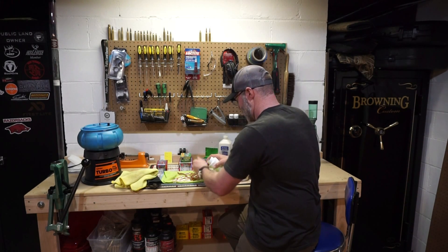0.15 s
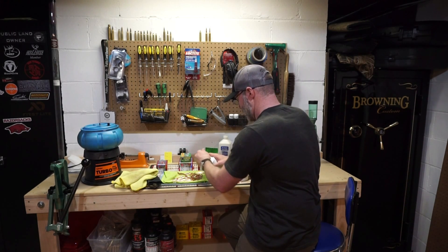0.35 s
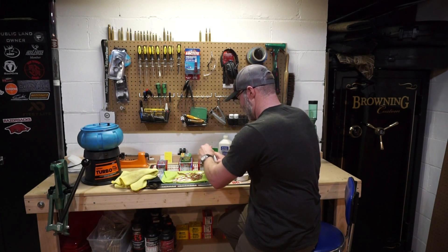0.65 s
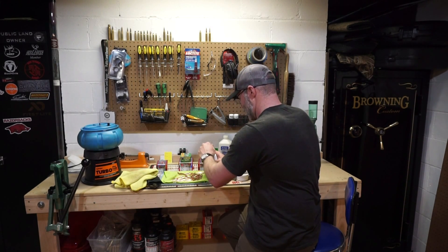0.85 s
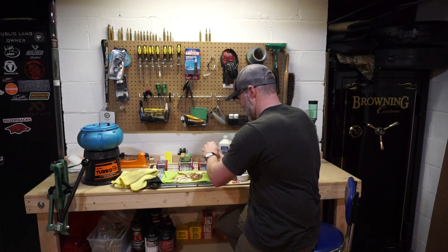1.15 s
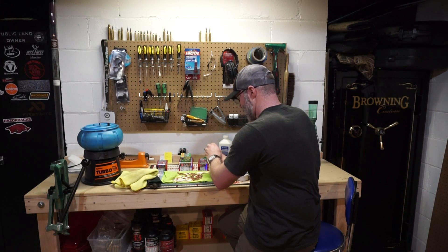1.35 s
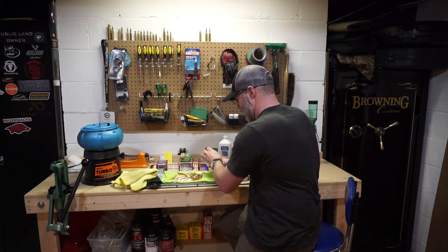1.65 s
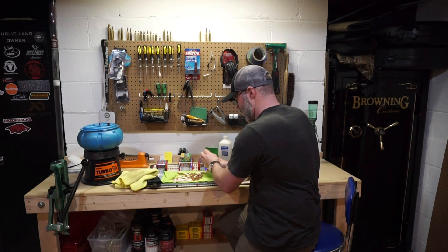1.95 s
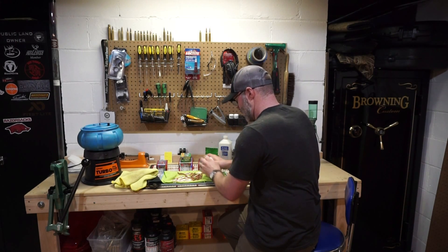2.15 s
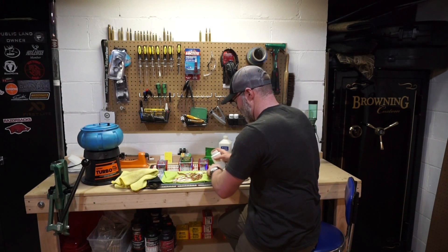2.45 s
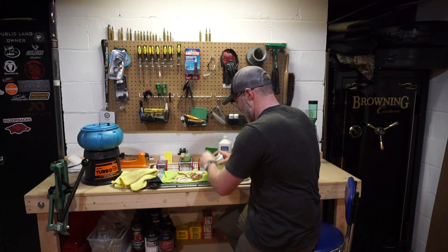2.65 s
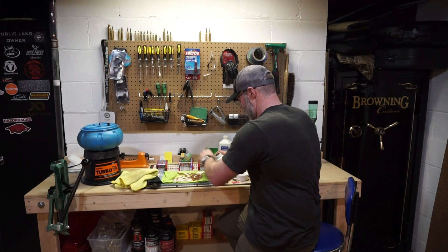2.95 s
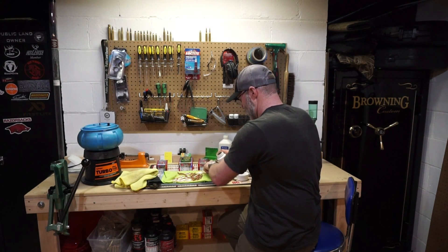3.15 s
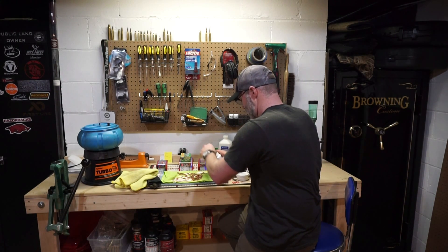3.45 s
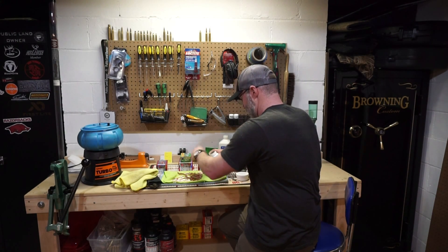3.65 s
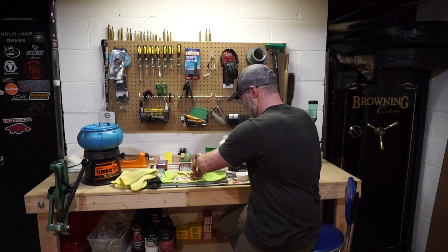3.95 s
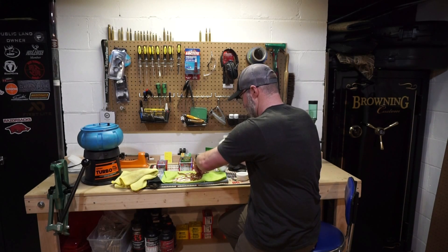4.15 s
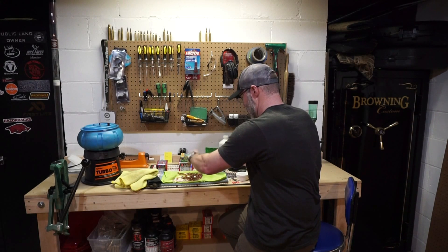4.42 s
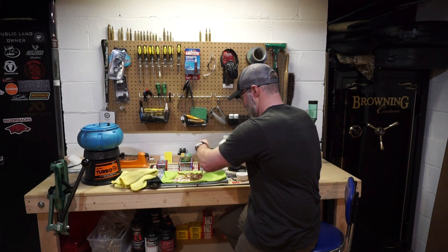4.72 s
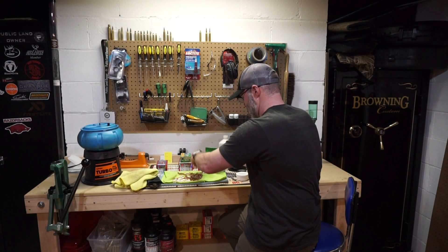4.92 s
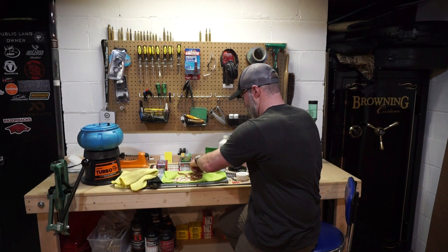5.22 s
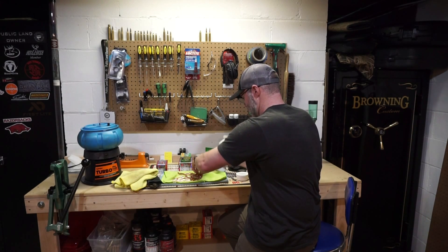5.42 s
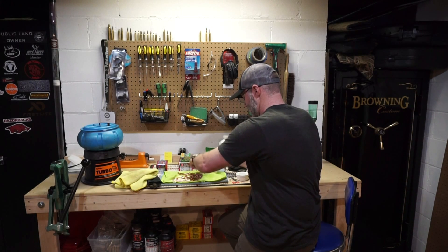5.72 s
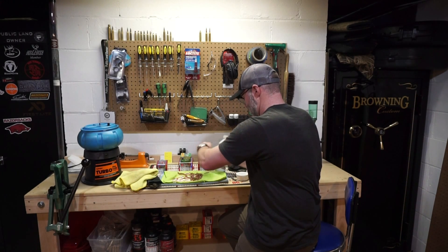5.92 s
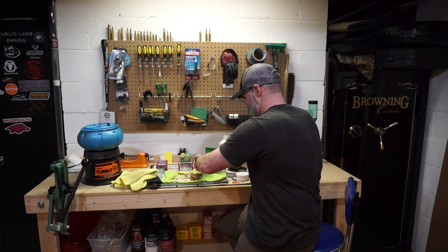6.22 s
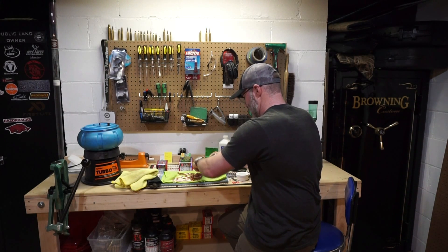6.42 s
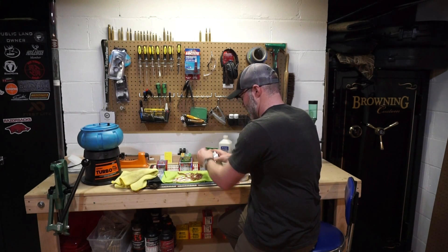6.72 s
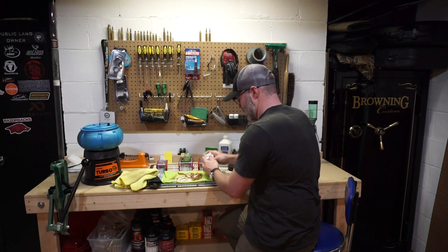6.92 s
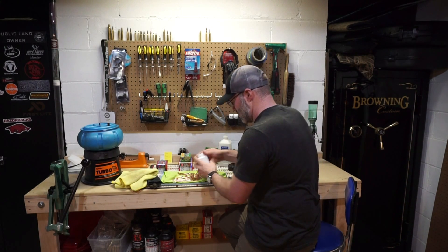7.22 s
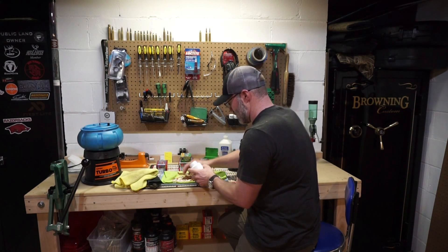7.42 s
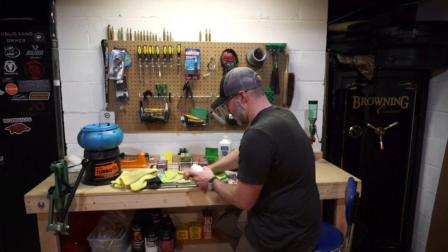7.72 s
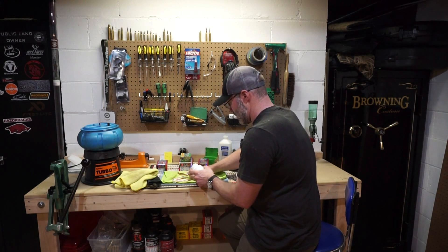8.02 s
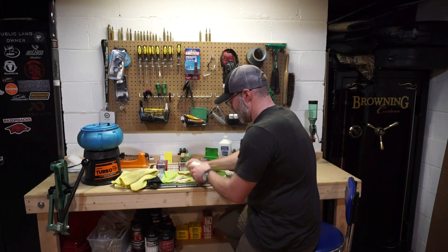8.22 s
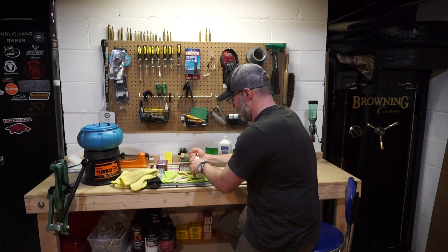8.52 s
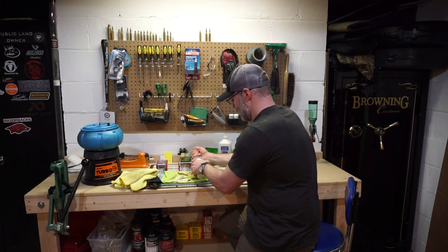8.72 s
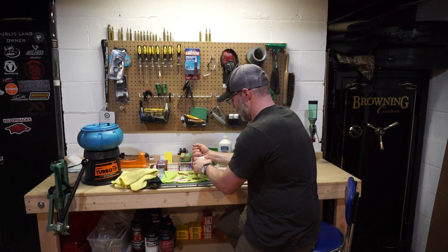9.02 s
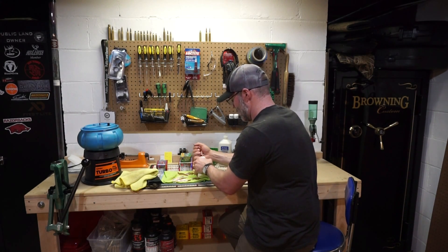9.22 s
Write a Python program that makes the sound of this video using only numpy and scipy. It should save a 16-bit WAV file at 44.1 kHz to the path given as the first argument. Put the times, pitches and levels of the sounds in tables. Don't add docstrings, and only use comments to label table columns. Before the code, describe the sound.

Fingers pick at small hollow brass shells with very high, thin clinks, then drop them by the handful into a plastic tub on a wooden bench. The tub answers with dry, hollow knocks and short rattles, some with a soft bench thump. Bursts alternate with sparse ticking and quieter gaps. Close stereo microphone, tub slightly left, short hard-walled room tail, faint ventilation and motor hum.

```python
import sys
import numpy as np
from scipy import signal
from scipy.fft import rfft, irfft
from scipy.io import wavfile
from scipy.ndimage import uniform_filter1d

SR = 44100
rng = np.random.default_rng(int(sys.argv[2]) if len(sys.argv) > 2 else 0)


def ratio(d):
    e = np.asarray(d, float) / 20
    return 10 ** e


def output_pcm(signal):
    pcm = np.clip(np.atleast_2d(signal).T, -1, 1) * 32767
    wavfile.write(sys.argv[1], SR, np.round(pcm).astype(np.int16))


N = 413216

# (time [s], peak [dB], click against ring [dB], left-right difference [dB])
PICKS = [(0.0074, -9, -33.5, 8), (0.0201, -7, -38, 4.0), (0.538, -22, -22, 1), (0.5473, -9.5, -31.5, 4),
         (0.621, -24.5, -21, -8), (0.699, -20, -23.5, -1.5), (0.7235, -15, -34, -10),
         (1.1932, -13, -22, -1.5), (1.772, -9, -20, 1.5), (1.859, -20, -26, 1.5), (2.1082, -17.5, -27, 12),
         (3.1944, -19, -27, 2), (3.91, -12.5, -26, 4), (3.9564, -25, -23.5, -20), (4.014, -24, -24, -9),
         (4.0338, -4.5, -36.5, 2), (4.0667, -1.5, -36.5, 2), (4.1085, -15, -32, 7), (4.1465, -11.5, -36, 5),
         (4.2916, -22, -32, 1.5), (4.351, -21.5, -33, 7), (4.3844, -23, -33, -1.5),
         (4.4308, -23.5, -34, 0.0), (4.5133, -19.5, -29.5, 6), (4.563, -13, -37, 6),
         (4.6389, -18, -42, 3.0), (4.7122, -11, -44, 1.5), (5.2744, -37, -27.5, 16)]
# (time [s], peak [dB], click against ring [dB], left-
# right difference [dB])
LATER_PICKS = [(5.4909, -17, -29, 6), (5.504, -7.5, -43, 2), (5.569, -14, -42, 2.5), (5.598, -24, -29, 2.5),
               (5.6532, -17, -30, 1.5), (5.658, -5.5, -36, -1.5), (5.683, -15, -29, 1.5), (5.798, -20, -33, 5),
               (6.161, -11, -11, -1), (6.188, -3.5, -18, -1), (7.6045, -9, -28, 15.5), (7.6825, -8, -22.5, 5),
               (7.7324, -6, -37, 19), (7.773, -10.5, -26, 16), (7.849, -7, -30, 3), (7.8907, -11, -30, 1.0),
               (7.9223, -1, -29.5, 2), (7.938, -6, -27, 2.5), (8.0331, -9.5, -27, 3), (8.0729, -6.5, -17.5, 4),
               (8.2312, -20, -23, 14), (8.2786, -28, -23, 0.0), (8.382, -20, -29, 3.5), (8.4029, -1.5, -24.5, 3),
               (8.47, -14, -23, -2), (9.0828, -17.5, -6.5, 0), (9.152, -7.5, -27, 6), (9.208, 1.5, -34, 0.0),
               (9.3294, -3.5, -26, -2), (9.3545, -1, -21, -0.5)]
# (time [s], tub peak [dB], shell ring [dB], hollow against peak [dB])
DROPS = [(0.417, -38, -41, -4), (0.433, -27, -42, -1.5), (0.713, -21.5, -38, -26), (0.747, -14, -21.5, -15),
         (0.828, -6, -9, -14), (0.851, -0.5, -10, -11.5), (0.883, -5, -27, -19), (0.931, -26, -25, -23),
         (0.987, 0.5, -15, -14.5), (1.104, -2, -7, -15.5), (1.229, -11.5, -15.5, -14),
         (1.346, -15.5, -28, -22.5), (1.614, -11, -60, -28), (1.713, -7, -24, -24), (1.733, -7, -11.5, -30),
         (1.801, -14, -18, -8.5), (1.823, -10, -27, -17.5), (2.454, -34.5, -46, -22),
         (2.495, -32, -45, -19), (2.711, -60, -36, -32), (2.877, -32, -49, -10), (2.892, -25.5, -44, -16),
         (2.994, -8.5, -17, -31), (3.021, -1, -7, -24), (3.511, -44, -41, -26), (3.644, -12.5, -32, -55),
         (3.675, -7, -1.5, -51), (3.704, -3.5, -2, -45), (3.767, -9.5, -5, -25)] + [(4.751, -9, -26, -11), (4.874, -6.5, -9.5, -31), (4.907, -2, -10, -29),
                           (4.939, -5, -3.5, -36), (4.972, -2, -16, -31), (5.01, -6.5, -11, -13.5),
                           (5.085, -11.5, -19, -11.5), (5.111, -15, -17.5, -17), (5.178, -22.5, -38, -17),
                           (6.014, -28, -51, -17), (6.093, -13.5, -43, -49), (6.127, 0.5, -11, -18.5),
                           (6.292, -16.5, -22.5, -18), (6.415, -29.5, -43, -21), (6.452, -25, -33, -29),
                           (6.577, -31, -37, -28), (6.669, -32.5, -38, -30), (6.712, -13.5, -27, -13.5),
                           (6.799, -18, -37, -25), (6.842, -17.5, -43, -34), (6.878, -28, -32, -23),
                           (6.904, -9.5, -8.5, -26), (6.963, -14, -18, -18), (7.182, -27.5, -35, -39),
                           (7.212, -22.5, -24, -38), (7.239, -10, -23, -25), (7.284, -22, -18, -30),
                           (7.34, -14.5, -30, -30), (7.37, -11, -17, -26), (7.519, -20, -34, -18)] + [(7.617, -25, -25, -36), (7.638, -19, -21, -42),
                                             (7.763, -20.5, -34, -32), (8.486, -11, -19, -15),
                                             (8.535, -37, -32, -13), (8.558, 2, -19, -15.5),
                                             (8.612, -2.5, -11, -16), (8.685, -7, -33, -3.5),
                                             (8.727, -13, -19, -35), (8.836, -31, -38, -51),
                                             (8.913, -12, -16, -20), (8.939, -8.5, -7, -22),
                                             (9.068, -9.5, -29, -25), (9.168, -13, -24, -38),
                                             (9.214, -1.5, -15, -5.5), (9.265, -12.5, -4.5, -8),
                                             (9.289, -13, -24, -36), (9.315, -9.5, -7.5, -44)]
SHELL_HZ, SHELL_SCATTER_HZ, SHELL_BAND_HZ = 14220, 227, 380
LOOSE_FROM_S, LOOSE_SHARP_HZ = 3.5, 232
SHELL_RISE_S, CHATTER_DB, CHATTER_T60_S = 0.00035, -8, 0.04
LANDING_LAG_S, LANDING_RING_DB, LANDING_CLICK_DB = 0.0034, 5.5, -21

# (frequency [Hz], level [dB], t60 [s])
TUB_MODES = [(737, -9, 0.062), (1030, -28, 0.066), (1310, -2, 0.073), (1410, -71, 0.029), (1750, -33, 0.24),
             (1870, -1, 0.1), (2100, 3, 0.066), (2378, 3.5, 0.064), (3370, -4.5, 0.1), (4620, 10, 0.012),
             (6640, -4, 0.1)]
# (frequency [Hz], level per Hz [dB])
CRACK_SPECTRUM = [(150, -35.5), (250, -31), (544, 1), (856, 1), (1060, -4.5), (3230, 3), (8540, -11),
                  (12000, -6.5), (15600, -33), (22000, -120)]
# (time [s], hollow [Hz], lower wall mode [dB], upper wall mode [dB], hollow in the rattle [dB])
GRIP = [(.4, 491, 8, -24, -6), (.8, 453, 0, -25, -11), (1.2, 453, 2, 4, -6), (1.7, 439.6, 2, 1, -15),
        (2.5, 517, -20, -24, -7), (3.9, 511, -20, -30, -27), (4.75, 459, -18, -6, -8),
        (5.0, 518.3, -11, -6, -10), (6.9, 506, -11, -9, -10), (7.3, 497, -16, -8, -7),
        (7.5, 493, -24, -21, -10), (8.5, 499, -2, -31, -8), (8.57, 455, 2, -31, -10),
        (8.66, 480, 2, -31, -19), (9.37, 455.6, -11, -15, -12)]
# (time [s], peak [dB])
TOUCHES = [(.529, -34), (.633, -45), (1.03, -4), (1.06, -16), (2.107, -28.5), (2.133, -33), (4.927, -10),
           (6.516, -27.5), (7.395, -9.5), (7.415, -21), (7.55, -17), (7.675, -20), (7.71, -21), (7.79, -25),
           (7.841, -22.5), (1.607, -20), (8.314, -42), (8.35, -28), (8.44, -25), (2.711, -28),
           (8.075, -26.5), (8.14, -32)]
MODE_SPREAD_DB, WALL_SCATTER, CRACK_RISE_S = 3.5, 0.024, 0.001
HOLLOW_SPLIT_HZ, HOLLOW_T60_S = 28, 0.13
TUB_LOW_HZ = 363

# (time [s], peak [dB], frequency [Hz])
LOW_PINGS = [(0.5287, -38.5, 2270), (0.633, -44, 2180), (0.7128, -19.5, 2130), (0.7462, -20, 2190),
             (0.828, -5.5, 1830), (0.854, 1.5, 1860), (0.8809, -22, 1900), (0.9298, -20, 1870),
             (0.9862, -9, 2220), (1.0266, -3.5, 1820), (1.0482, -4, 1830), (1.1036, -6.5, 1960),
             (1.2273, -21, 1900), (1.3474, -18, 2065), (1.6142, -11, 2040), (1.7123, -25, 1710),
             (1.799, -23, 1790), (2.1046, -40, 1980), (2.4982, -42, 1970), (2.8906, -44, 1870),
             (2.9936, -35, 2150), (3.021, -34, 2070), (3.5189, -39.5, 2140), (3.6441, -20, 2200),
             (3.703, -28, 2150), (4.751, -21, 1920), (4.8736, -15, 1930), (4.9395, -15, 1760),
             (4.9731, -23, 2140), (5.0094, -15, 1890), (5.0858, -23, 1840), (5.1774, -32, 2100),
             (6.094, -17, 2280), (6.128, -16, 1910), (6.2923, -25, 1910), (6.4512, -32, 1890),
             (6.5154, -41, 1890), (6.7118, -30, 1820), (6.7984, -25, 1940), (6.9027, -28, 1960),
             (6.9618, -19, 1940)] + [(7.2125, -31, 1930), (7.2384, -36, 1910), (7.2858, -13, 1910),
                                 (7.3412, -17, 2010), (7.3694, -20, 2070), (7.3951, -16, 1965),
                                 (7.4145, -29, 1930), (7.5193, -24, 1980), (7.5494, -27, 2330),
                                 (7.6176, -34, 1760), (7.674, -21.5, 1990), (7.7124, -25, 2000),
                                 (7.8416, -32, 1800), (8.4028, -34, 1970), (8.4402, -39, 1990),
                                 (8.4866, -23, 1940), (8.5579, -1, 2236), (8.6143, -5, 1770),
                                 (8.6294, -9, 1800), (8.6847, -20, 2020), (8.7271, -18, 2110),
                                 (8.8363, -28.5, 2090), (8.9391, -30, 1940), (9.0678, -30, 1980),
                                 (9.1674, -30, 2000), (9.2145, -28, 2130), (9.2658, -16, 2000),
                                 (9.2884, -14, 2230), (9.3144, -26, 1980), (9.3447, -14, 1780)]
# (time [s], peak [dB], frequency [Hz])
HIGH_PINGS = [(0.8524, -14, 3360), (0.9877, -18, 3630), (1.2296, -16.5, 3530), (1.7135, -24, 3650),
              (1.822, -20, 3430), (2.1066, -38, 3880), (2.9954, -22, 3060), (3.0217, -9, 3740),
              (4.7506, -25, 3580), (4.874, -23, 3180), (4.908, -13, 3220), (5.01, -7, 3320),
              (5.0858, -15.5, 3350), (5.1104, -19, 2500), (6.0144, -36, 3160), (6.128, -17, 2640),
              (6.161, -17, 3170), (6.1873, -10, 3200), (6.293, -16, 3230), (6.4522, -23.5, 3280),
              (6.714, -25, 2540), (6.8438, -24, 3800), (6.8805, -26, 3340), (6.903, -13, 3370),
              (6.9626, -11.5, 3260), (6.989, -14, 3260), (7.182, -22, 3260), (7.2387, -17, 3320),
              (7.3692, -13, 3420), (7.3944, -27, 3330), (7.547, -27, 2600), (7.6181, -25, 2550),
              (7.6417, -22, 2760), (7.675, -27, 2780), (7.7085, -24, 2730), (7.7633, -30, 2910),
              (7.7852, -24, 2860), (8.5574, -9, 2505), (9.066, -22, 3310), (9.215, -10, 3300)]
# (time [s], peak [dB], frequency [Hz])
ODD_PINGS = [(.747, -17, 700), (.535, -35, 660), (1.35, -18, 1820), (1.62, -16, 1900), (4.751, -13.5, 3400),
             (7.38, -18, 4830), (7.65, -23, 4200), (0.884, -6.5, 1270), (1.734, -12, 1550),
             (1.733, -27, 1310), (1.823, -18, 730), (3.675, -13.5, 1300), (3.021, -5, 4870),
             (4.874, -12.5, 764), (4.927, -5, 4350), (4.972, -15, 4380), (8.565, -8, 703),
             (8.563, -9.5, 1020), (8.939, -12, 4690), (9.265, -17, 5300), (9.289, -11, 4900)]
# (time [s], peak [dB], frequency [Hz], t60 [s])
RINGING = [
    (.434, -30.5, 1860, .16),
    (.434, -31, 1290, 0.099),
    (5.045, -27, 511, .15),
    (5.179, -26, 3260, 0.076),
]
PING_DB, PING_T60_S, PING_RISE_S = 1.5, 0.028, 0.001
TWIN_SHARP, TWIN_DB = 1.047, 0

# (start time [s], hold [s], shells [dB], tub [dB])
POURS = [(0.825, 0.3, -10, -10), (1.721, 0.11, -28, -23.5), (3.015, 0.011, -7, -3),
         (3.674, 0.039, -14, -7.5), (4.869, 0.077, -8.5, -9), (5.503, 0.074, -28, -70),
         (6.132, 0.049, -17, -12), (6.898, 0.037, -18, -15.5), (7.226, 0.2, -27.5, -24.5),
         (7.526, 0.28, -39, -33), (7.632, 0.35, -20.5, -39.5), (8.027, 0.5, -34.5, -50),
         (8.442, 0.084, -35, -28), (8.554, 0.13, -16.5, -18.5), (8.928, 0.0075, -34, -10.5),
         (9.057, 0.067, -31, -31.5), (9.207, .2, -24, -16)]
POUR_ATTACK_S, POUR_RELEASE_DB_PER_S, RESTING_DB = 0.0083, 278, -67
HEAP_PER_S, HEAP_T60_S = 900, 0.022
SLIDE_HOLLOW_HZ = (452, 480, 512)
UPPER_WALL_HZ, WALL_T60_S, SLIDE_WALL_DB = 3280, 0.04, -3

# (time [s], peak [dB])
THUDS = [
    (0.748, -20),
    (3.02, -21),
    (6.128, -20),
    (8.939, -23.5),
]
# (frequency [Hz], level [dB], t60 [s])
BENCH_MODES = [(86, -20, 0.26), (184, -11, 0.048), (274, -4, 0.063)]

# (frequency [Hz], t60 [s])
WALLS = [(300, 0.22), (1000, 0.27), (4000, 0.27), (9000, 0.21), (14500, 0.2)]
# (frequency [Hz], likeness [-1 to 1])
ECHO_LIKENESS = [(250, -0.063), (600, 0.69), (2000, 0.19), (5000, 0.06), (14000, -0.098)]
PINGS_WET_DB, SHELLS_WET_DB = -4, -3

# (frequency [Hz], level per Hz [dB])
AIR_SPECTRUM = [(15, -36), (25, -16.5), (117, -8.5), (153, -12.5), (285, -10), (405, -14), (503, -12.5),
                (734, -12.5), (840, -9), (1040, -17.5), (1330, -20), (2050, -24.5), (16000, -28)]
# (frequency [Hz], likeness [0 to 1])
AIR_LIKENESS = [(30, 0.9), (70, 1), (130, 0.81), (280, 0.43), (600, 0.28), (2000, 0.027), (8000, 0.033)]
# (centre [Hz], width [Hz], level [dB])
HUM = [(841, 4.6, -58), (903, 49, -61)]
# (time [s], level [dB])
WHINE = [(0, -50), (3.6, -52), (4.2, -61.5), (9.37, -60)]
# (time [s], level [dB])
RUMBLE = [(0, 0.5), (.82, 3.5), (.9, -10), (1.8, -1.5), (2.8, 3), (3.4, 7), (4.0, -0.5), (6.5, -1),
          (7.2, 1), (9.37, 2.5)]
AIR_DB, RUMBLE_HZ = -46.5, 266
WHINE_HZ, WHINE_CLIMB_HZ_PER_S = 281, 2.1
MAINS_HZ, MAINS_DB = 119, -59
BEATS_PER_S, BEAT_TOP_S = 1.05, 3.36
CUTOFF_HZ = 15660


def rms_one(x):
    return x / np.sqrt(np.mean(x ** 2) + 1e-20)


def in_time(rows):
    s, *columns = np.transpose(rows)
    return [np.interp(np.arange(N) / SR, s, c) for c in columns]


def at_hz(points, hz):
    table_hz, values = np.transpose(points)
    return np.interp(np.log(np.maximum(hz, 1)), np.log(table_hz), values)


def coloured(x, spectrum):
    cepstrum = irfft(np.log(ratio(at_hz(spectrum, np.fft.rfftfreq(1024, 1 / SR)))))
    cepstrum[1:512] *= 2
    cepstrum[513:] = 0
    return signal.fftconvolve(x, irfft(np.exp(rfft(cepstrum))))[:N]


def ring(clicks, hz, t60):
    r, w = ratio(-60 / (t60 * SR)), 2 * np.pi * hz / SR
    return signal.lfilter([0, np.sin(w)], [1, -2 * r * np.cos(w), r * r], clicks + 1e-18)


def decaying(hz, t60, size=4500):
    t = np.arange(size) / SR
    return np.sin(2 * np.pi * hz * t) * ratio(-60 * t / t60)


def rising(size, rise_s):
    return np.clip(np.arange(size) / SR / rise_s, 0, 1)


def high_pass(x, order, hz):
    return signal.sosfilt(signal.butter(order, hz, "high", fs=SR, output="sos"), x)


def band_pass(x, order, low_hz, high_hz):
    return signal.sosfilt(signal.butter(order, [low_hz, high_hz], "band", fs=SR, output="sos"), x)


def grains(per_s, spread_db):
    sizes = ratio(spread_db * np.minimum(rng.exponential(1, N), 4)) * rng.choice([-1, 1], N)
    return sizes * (rng.random(N) < per_s / SR)


def add(track, s, piece):
    i = round(s * SR)
    part = track[..., i:i + piece.shape[-1]]
    part += piece[..., :part.shape[-1]]


def clinks():
    landed = [(s + LANDING_LAG_S, db + LANDING_RING_DB, LANDING_CLICK_DB, 2.5) for s, _, db, _ in DROPS]
    hits, size = PICKS + LATER_PICKS + landed, 3000
    out, t = np.zeros((2, N)), np.arange(size) / SR
    bounces = rng.random((len(hits), 2))
    detunings = SHELL_SCATTER_HZ * rng.standard_normal((len(hits), 3))
    clicks = high_pass(rng.standard_normal((len(hits), size)), 2, 7000)
    chatters = rms_one(band_pass(clicks, 2, SHELL_HZ - SHELL_BAND_HZ, SHELL_HZ + SHELL_BAND_HZ))
    chatters = chatters * ratio(CHATTER_DB - 60 * t / CHATTER_T60_S)
    clicks = clicks * ratio(-60 * t / 0.03)
    for (s, db, click_db, pan_db), (delay, loss), detune, click, chatter in zip(
            hits, bounces, detunings, clicks, chatters):
        centre = SHELL_HZ + LOOSE_SHARP_HZ * (LOOSE_FROM_S < s < LATER_PICKS[0][0])
        shells = ratio(-3.5) * decaying(centre + 0.35 * detune[0], 0.054, size)
        shells = shells + ratio(-9.5) * decaying(centre + detune[1], 0.031, size)
        shells = shells + ratio(-6) * decaying(centre + detune[2], 0.013, size)
        shells = shells + ratio(min(click_db + 33, 2.5)) * chatter
        shells = shells * rising(size, SHELL_RISE_S)
        hit = ratio(db - 1.0) * shells + ratio(db + click_db + 15.5) * click
        hit = hit * ratio([[pan_db / 2], [-pan_db / 2]])
        add(out, s, hit)
        add(out, s + 0.0035 + 0.01 * delay, ratio(-4 - 6.5 * loss) * hit)
    return out


def knocks():
    blows, out = np.zeros(N), np.zeros(N)
    luck = rng.standard_normal((len(DROPS), 2, len(TUB_MODES) + 2))
    cracks = rng.standard_normal((len(DROPS), 900)) * ratio(-60 * np.arange(900) / SR / 0.027)
    cracks = cracks * rising(900, CRACK_RISE_S)
    grip_s, grip_hz, *_ = np.transpose(GRIP)
    for (s, db, _, hollow_db), (strengths, shifts), crack in zip(DROPS, luck, cracks):
        walls = 0
        for (hz, mode_db, t60), strength, shift in zip(TUB_MODES, strengths, shifts):
            mode = decaying(hz * (1 + WALL_SCATTER * shift), t60 / 3, size=1800)
            walls = walls + ratio(mode_db + MODE_SPREAD_DB * strength) * mode
        add(out, s, ratio(db - 16) * walls)
        hollow_hz = np.interp(s, grip_s, grip_hz)
        upper = decaying(hollow_hz + HOLLOW_SPLIT_HZ, HOLLOW_T60_S)
        pair = decaying(hollow_hz, HOLLOW_T60_S) + ratio(-11.0 + strengths[-1]) * upper
        add(out, s + 0.002, ratio(db + hollow_db + 2.0) * pair * rising(4500, 0.0041))
        add(blows, s, ratio(db + 2.5) * crack)
    for (s, db), crack in zip(TOUCHES, cracks):
        add(blows, s, ratio(db) * crack)
    return out + coloured(blows, CRACK_SPECTRUM)


def pings():
    out, rise = np.zeros(N), rising(2500, PING_RISE_S)
    for s, db, hz in LOW_PINGS + HIGH_PINGS + ODD_PINGS:
        twin = decaying(hz * TWIN_SHARP, PING_T60_S / 2, size=2500)
        pair = decaying(hz, PING_T60_S, size=2500) + ratio(TWIN_DB) * twin
        add(out, s, ratio(db + PING_DB) * rise * pair)
    for s, db, hz, t60 in RINGING:
        add(out, s, ratio(db) * rise * decaying(hz, t60, size=2500) * rise[::-1])
    return out


def rattle():
    shells_gain, tub_gain = sliding()
    touch, dealt = grains(HEAP_PER_S, spread_db=4.5), rng.integers(0, 10, N)
    pitches = SHELL_HZ + 260 * rng.standard_normal(10)
    rings = sum(ring(touch * (dealt == k), hz, HEAP_T60_S) for k, hz in enumerate(pitches))
    rings = band_pass(rings, 1, 13000, 15500)
    shells = rms_one(rings) + ratio(-16.0) * rms_one(high_pass(touch, 2, 8000))

    taps = grains(per_s=1600, spread_db=4)
    body = sum(ratio(db) * ring(taps, hz, 0.33 * t60) for hz, db, t60 in TUB_MODES)
    hollow_hz, lower_db, upper_db, hollow_db = in_time(GRIP)
    hollow = sum(ring(taps, hz, 0.11) * ratio(-np.abs(hollow_hz + 10 - hz) / 2.3) for hz in SLIDE_HOLLOW_HZ)
    lower = ring(taps, 1790, WALL_T60_S) + ring(taps, 1885, WALL_T60_S)
    upper = ring(taps, UPPER_WALL_HZ, WALL_T60_S / 2)
    walls = ratio(lower_db) * rms_one(lower) + ratio(upper_db) * rms_one(upper)
    tub = ratio(SLIDE_WALL_DB) * walls + ratio(-2.5) * rms_one(body)
    tub = tub + ratio(hollow_db) * rms_one(hollow) + ratio(2.0) * rms_one(coloured(taps, CRACK_SPECTRUM))
    return shells_gain * shells + ratio(-11) * tub_gain * tub


def sliding():
    t, gains = np.arange(SR) / SR, np.full((2, N), ratio(RESTING_DB))
    for s, hold_s, shells_db, tub_db in POURS:
        decay = ratio(-POUR_RELEASE_DB_PER_S * np.maximum(t - hold_s, 0))
        add(gains, s, ratio([[shells_db], [tub_db]]) * rising(SR, POUR_ATTACK_S) * decay)
    return gains


def thuds():
    out = np.zeros(N)
    thud = sum(ratio(db) * decaying(hz, t60) for hz, db, t60 in BENCH_MODES) * rising(4500, 0.0064)
    for s, db in THUDS:
        add(out, s, ratio(db) * thud)
    return out


def spread(mid, side, alike):
    return np.sqrt(1 + alike) * mid + np.sqrt(1 - alike) * side * [[1], [-1]]


def room(x, wet_db):
    t, edges = np.arange(SR * 2 // 5) / SR, 150 * 2 ** np.arange(0, 7.1, .5)
    white, echo = rng.standard_normal((2, 6, len(t))), 0
    for low, high in zip(edges, edges[1:]):
        mid, side = band_pass(white, 2, low, high)
        centre = np.sqrt(low * high)
        alike = np.clip(at_hz(ECHO_LIKENESS, centre), -1, 1)
        echo = echo + spread(mid[:, None], side[:, None], alike) * ratio(-60 * t / at_hz(WALLS, centre))
    echo = echo * np.clip((t - .002) / 0.0017, 0, 1)
    echo = rfft(echo / np.sqrt(np.sum(echo ** 2) / 12), 20480)
    out = np.zeros((2, N))
    for k, i in enumerate(range(0, N, 2048)):
        add(out, i / SR, irfft(rfft(x[i:i + 2048], 20480) * echo[k % 6]))
    return ratio(wet_db) * out


def air():
    hz, white = np.fft.rfftfreq(N, 1 / SR), rfft(rng.standard_normal((2, N)))
    both = spread(white[0], white[1], np.clip(at_hz(AIR_LIKENESS, hz), 0, 1))
    out = ratio(AIR_DB - 2.0) * rms_one(irfft(both * ratio(at_hz(AIR_SPECTRUM, hz)), N))
    bass = irfft(rfft(out) / (1 + (hz / RUMBLE_HZ) ** 4), N)
    rumble_db = in_time(RUMBLE)[0]
    out = out + (ratio(rumble_db) - 1) * bass
    for centre_hz, width, db in HUM:
        resonance = 1 / (1 + (2 * (hz - centre_hz) / width) ** 2)
        out = out + ratio(db) * rms_one(irfft(both * resonance, N))
    t = np.arange(N) / SR
    tone = np.sqrt(2) * np.sin(2 * np.pi * (WHINE_HZ + WHINE_CLIMB_HZ_PER_S * t / 2) * t)
    beat = 1 + 0.69 * np.cos(2 * np.pi * BEATS_PER_S * (t - BEAT_TOP_S))
    mains = np.sin(2 * np.pi * MAINS_HZ * t) * beat
    return out + ratio(in_time(WHINE)[0]) * tone + ratio(MAINS_DB + rumble_db) * mains


def scene():
    shells, tub, struck = clinks(), knocks() + rattle(), pings()
    tub = high_pass(tub, 4, TUB_LOW_HZ)
    direct = shells + (tub + struck) * ratio([[.6], [-.6]])
    to_walls = tub + ratio(PINGS_WET_DB) * struck + ratio(SHELLS_WET_DB) * shells.mean(0)
    return ratio(-2.5) * direct + room(to_walls, wet_db=2.0) + thuds() + air()


def low_pass(x):
    return signal.sosfilt(signal.butter(12, 16810, fs=SR, output="sos"), x)


def record(dry):
    level_db = 10 * np.log10(uniform_filter1d(np.mean(dry ** 2, 0), 441) + 1e-12)
    slope = 40 * np.arange(N) / SR
    held_db = np.maximum.accumulate(level_db + slope) - slope
    cut_db = -.6 * np.maximum(held_db + 15.5, 0)
    cut_db = signal.lfilter([.004], [1, -.996], cut_db)
    mix = 1.19 * np.tanh(dry * ratio(cut_db) / 1.25)
    mix = signal.sosfilt(signal.cheby2(14, 60, CUTOFF_HZ + 650, fs=SR, output="sos"), mix)
    return low_pass(mix)


dry = scene()
out = record(dry)
output_pcm(out)
```